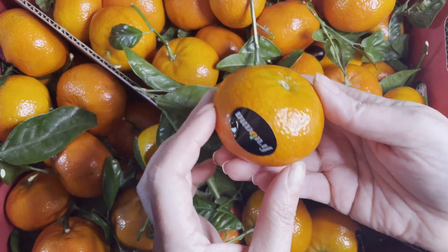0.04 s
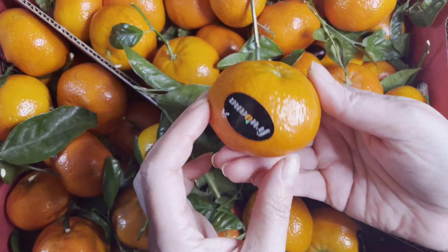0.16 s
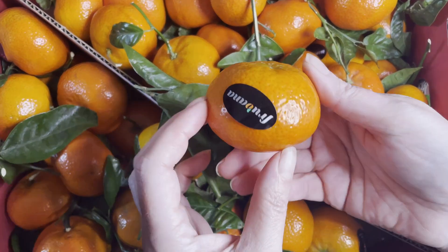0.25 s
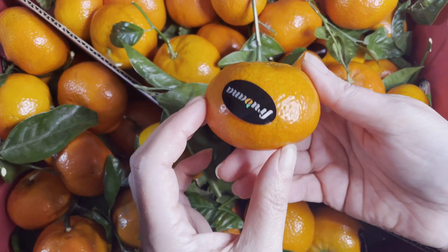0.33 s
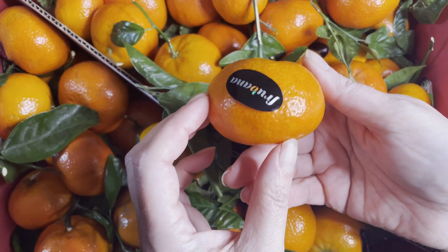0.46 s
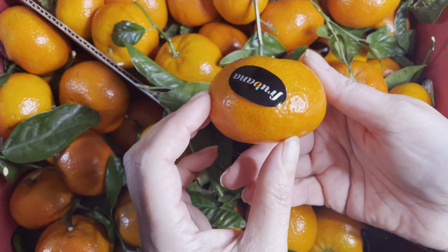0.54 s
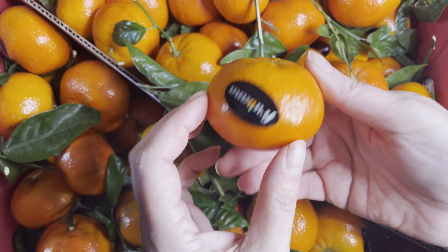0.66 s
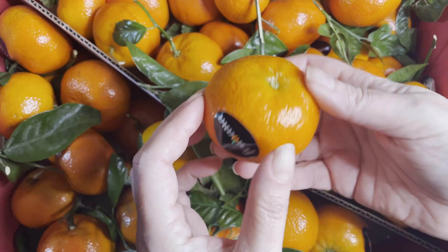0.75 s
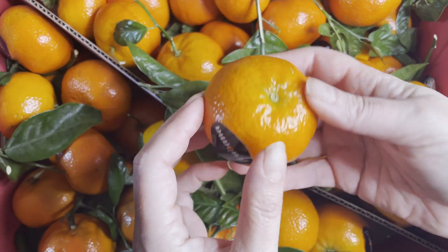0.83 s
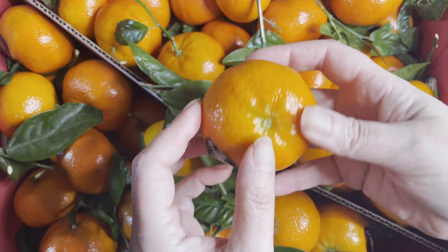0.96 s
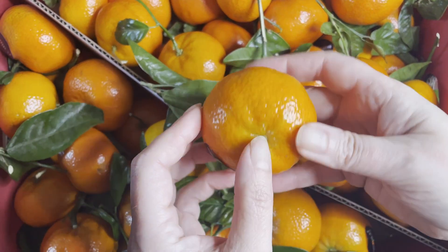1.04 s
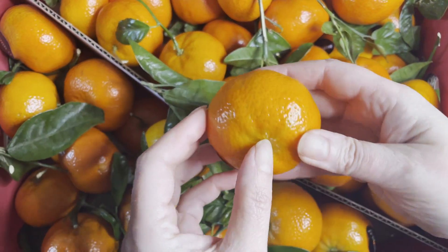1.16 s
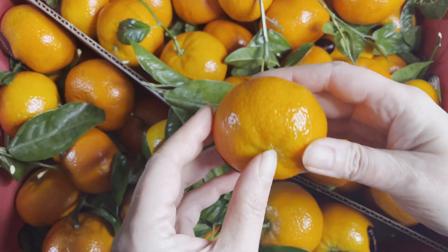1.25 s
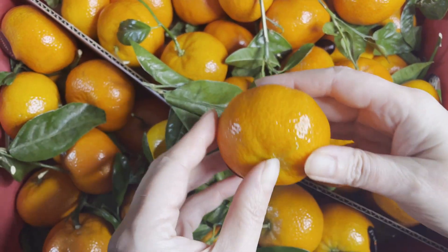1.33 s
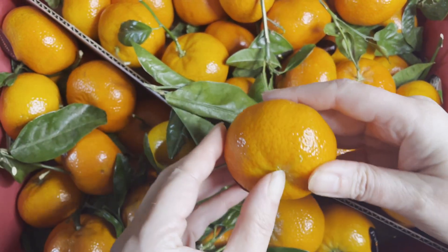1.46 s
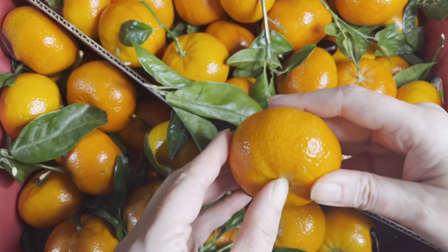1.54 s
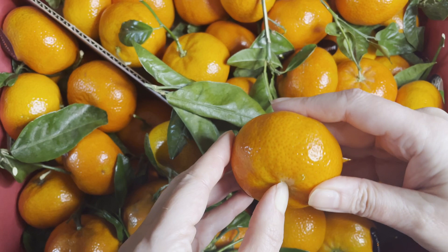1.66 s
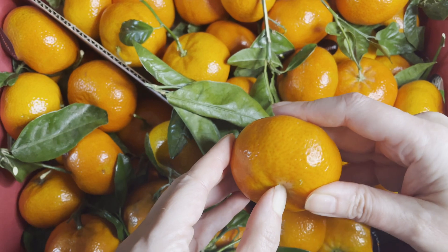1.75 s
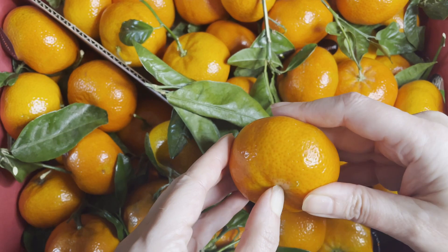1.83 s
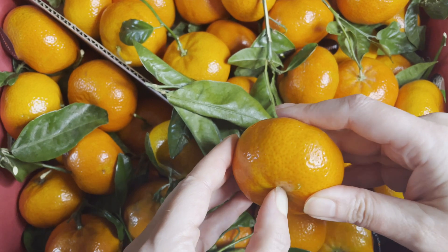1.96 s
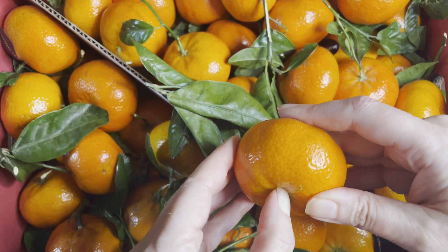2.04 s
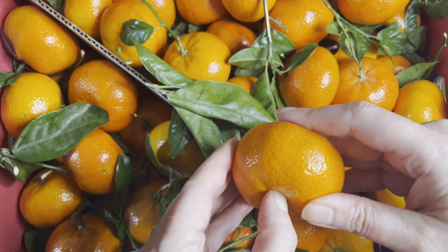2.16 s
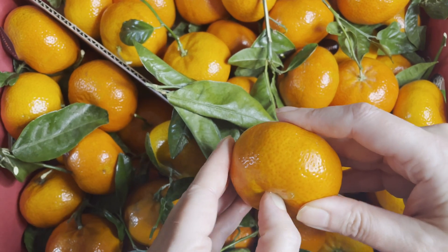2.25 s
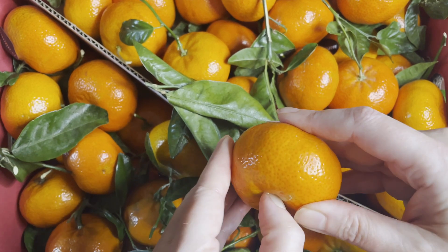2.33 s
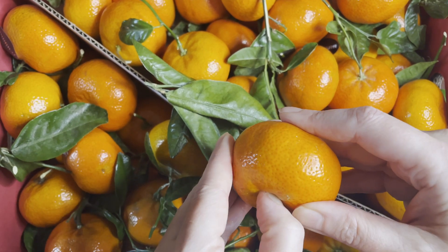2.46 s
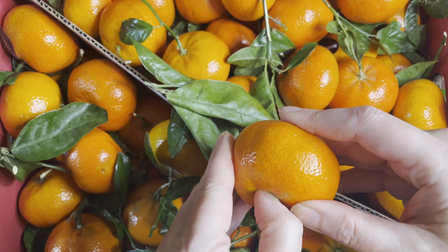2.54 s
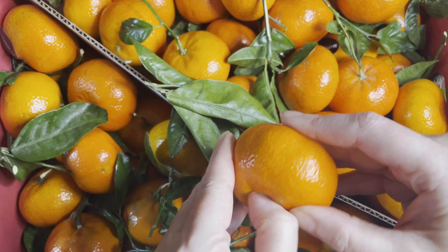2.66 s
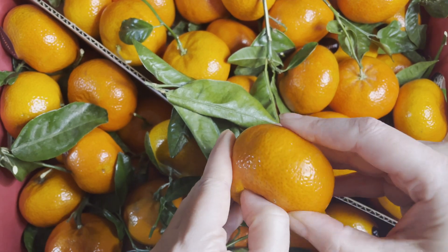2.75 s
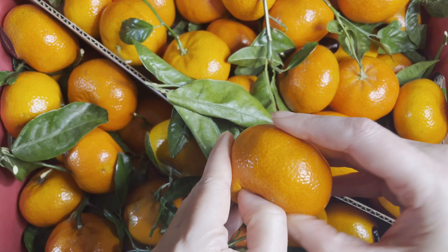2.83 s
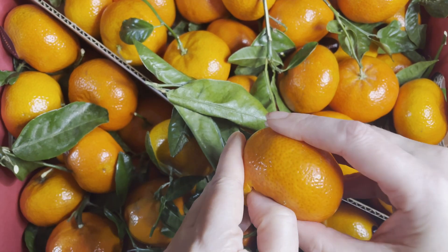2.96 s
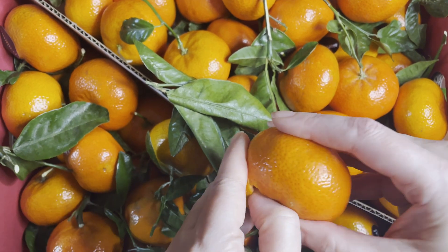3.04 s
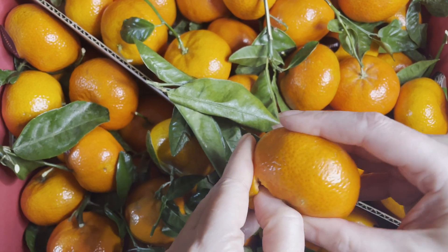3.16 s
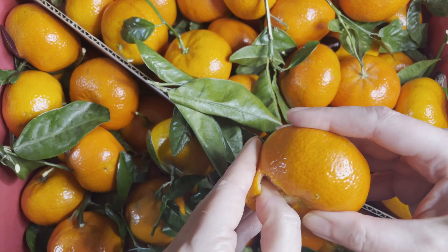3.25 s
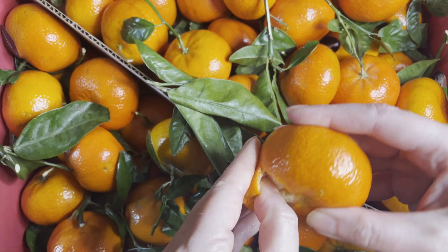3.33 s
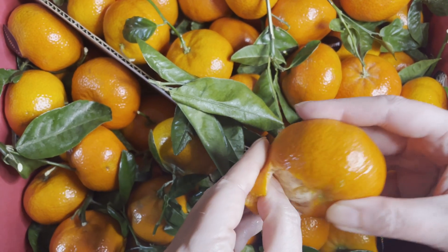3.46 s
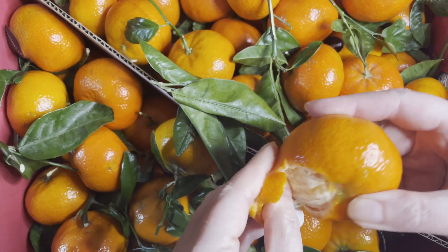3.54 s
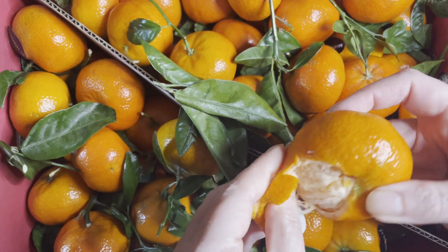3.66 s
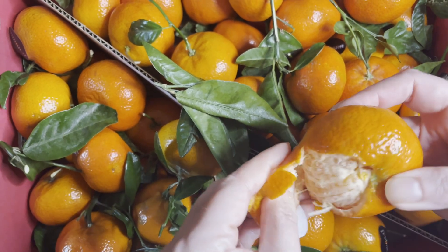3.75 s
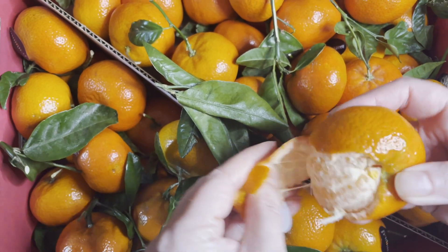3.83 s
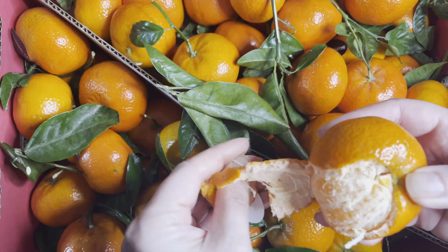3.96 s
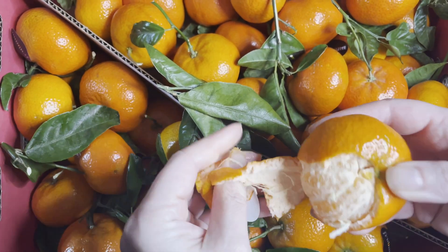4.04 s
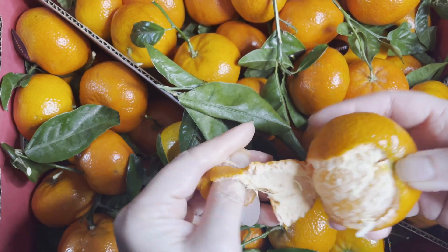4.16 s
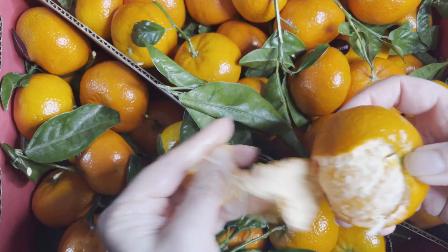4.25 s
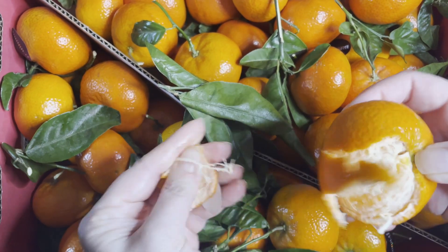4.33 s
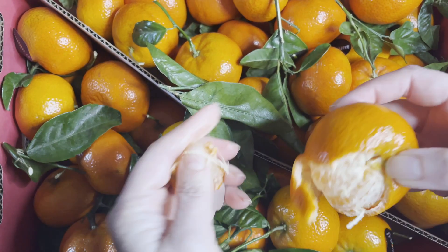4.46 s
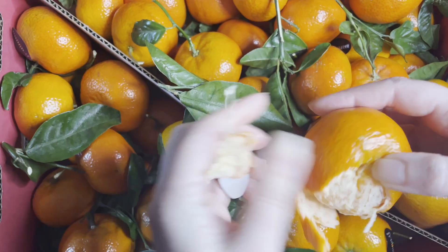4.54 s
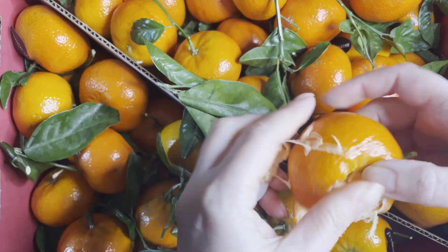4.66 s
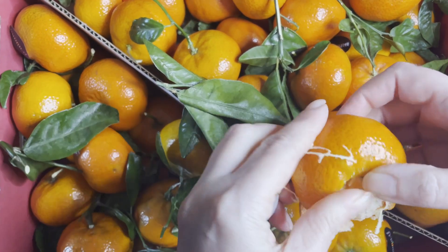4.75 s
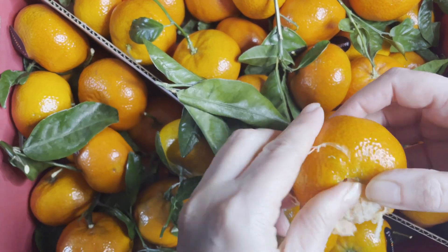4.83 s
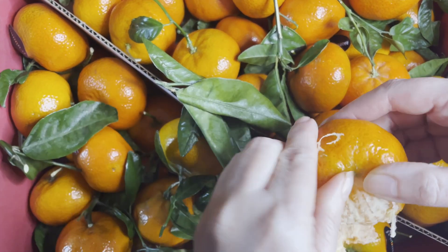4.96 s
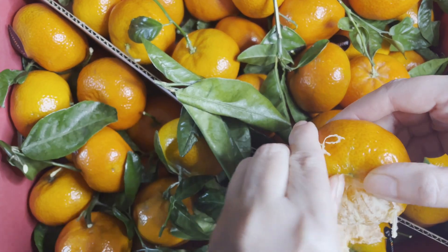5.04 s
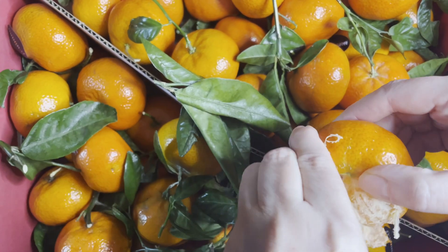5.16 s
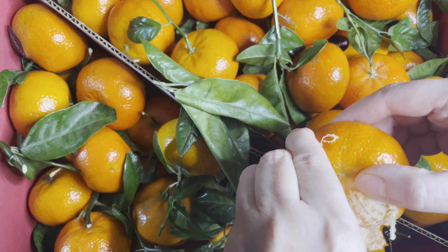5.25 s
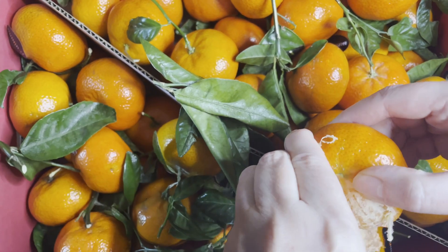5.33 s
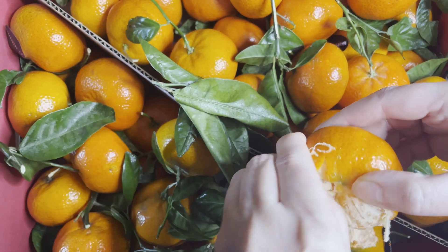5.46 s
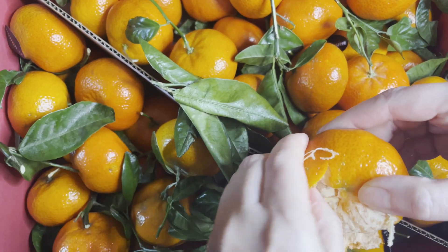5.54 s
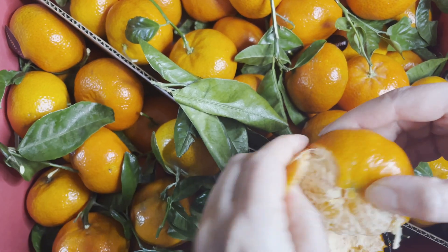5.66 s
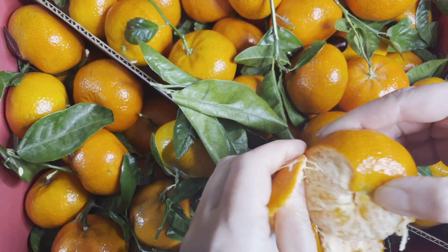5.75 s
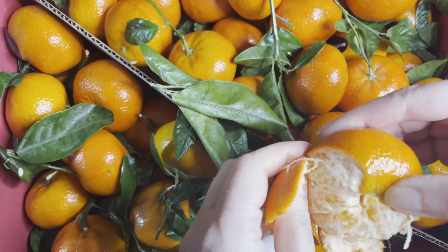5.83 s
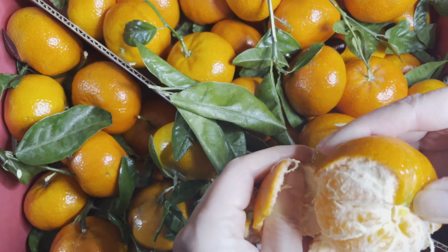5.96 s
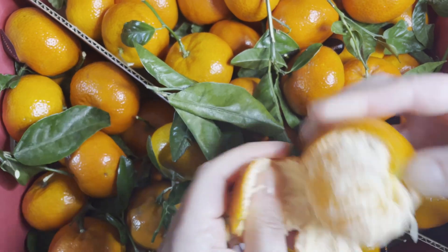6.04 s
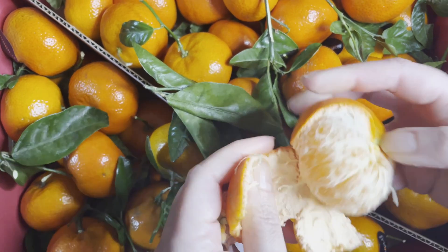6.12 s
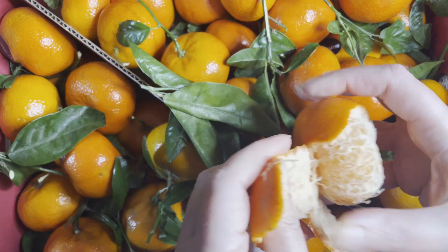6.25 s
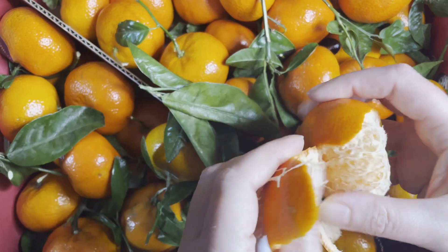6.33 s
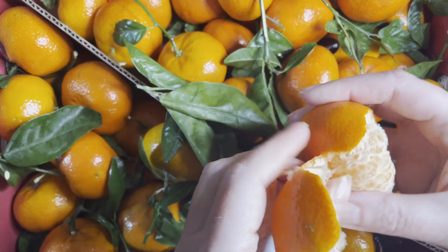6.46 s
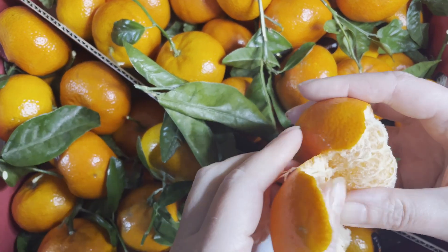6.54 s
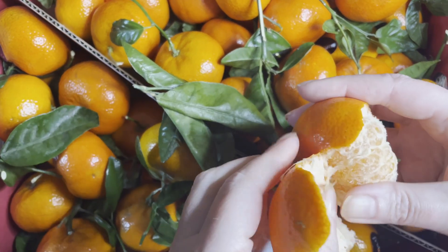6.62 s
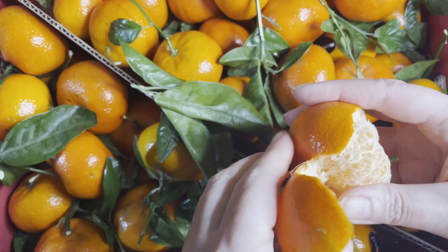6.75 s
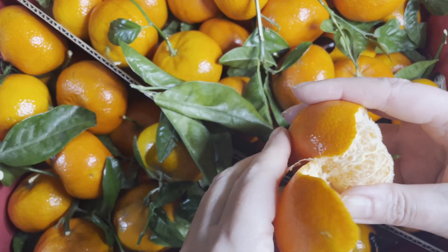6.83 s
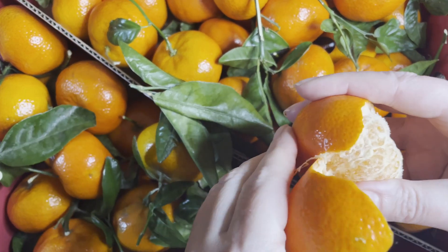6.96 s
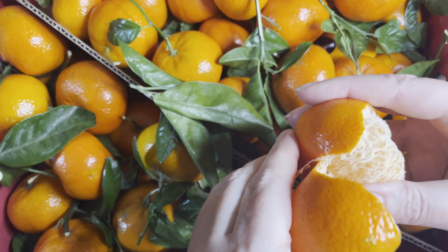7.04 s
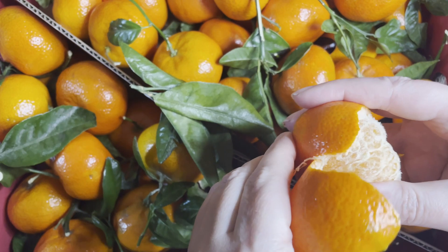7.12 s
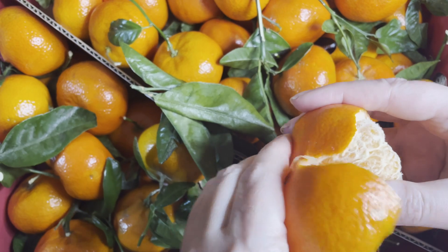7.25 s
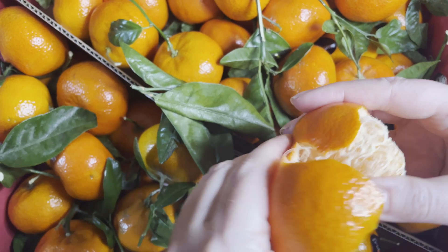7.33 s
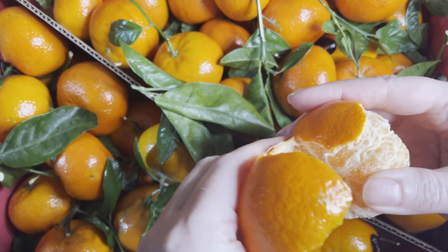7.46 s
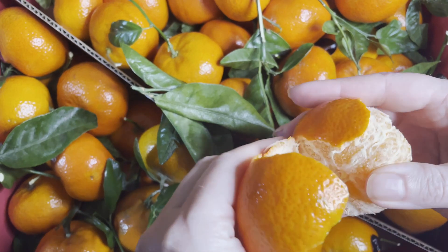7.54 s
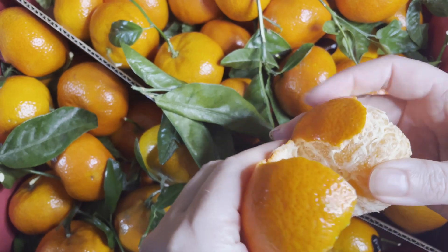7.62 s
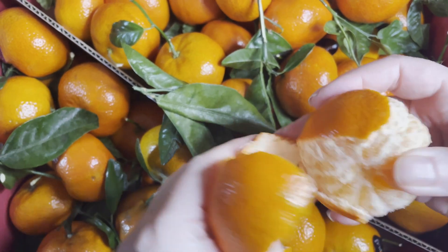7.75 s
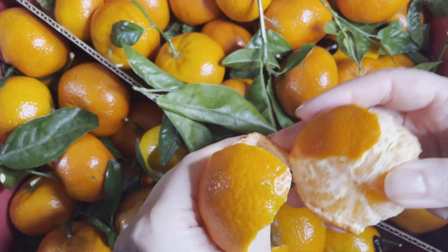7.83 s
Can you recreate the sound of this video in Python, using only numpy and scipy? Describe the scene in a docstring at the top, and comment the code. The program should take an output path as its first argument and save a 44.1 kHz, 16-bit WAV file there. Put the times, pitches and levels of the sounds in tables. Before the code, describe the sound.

Close, crisp tearing of citrus rind: bright snaps first, then bursts of wet-sounding crackle with short pauses, above a steady low machine hum.

```python
"""In a quiet, humming room, hands tear the peel off a mandarin close to a two-port microphone.
Pith fibres snap one by one as short coloured noise cracks; dense rips are hiss and random small cracks.
Fingertips rub the rind as friction noise, a pierced pore sprays a whistling jet of oil, and the fruit
knocks once against the palm as a few dying modes. Short reflections come off the hands and the room.
Behind them lie broad air noise, low room resonances and wavering hum lines."""
import sys
import numpy as np
from scipy import signal
from scipy.fft import rfft, irfft, next_fast_len
from scipy.io import wavfile
from scipy.ndimage import uniform_filter1d

SR = 44100
rng = np.random.default_rng(int(sys.argv[2]) if len(sys.argv) > 2 else 0)


def output_pcm(signal):
    """Save a mono or channel-first signal as 16-bit PCM at the path in sys.argv[1].

    Samples are clipped to [-1, 1] before scaling.
    """
    pcm = np.clip(np.atleast_2d(signal).T, -1, 1) * 32767
    wavfile.write(sys.argv[1], SR, np.round(pcm).astype(np.int16))


N = 347949  # samples, about 7.9 s


def gain_of(db):
    """Amplitude factor for a level in dB."""
    return 10 ** (np.asarray(db) / 20)


def evened(x):
    """Scales a sound to rms 1."""
    return x / np.sqrt(np.mean(x ** 2) + 1e-20)


def read(points, hz):
    """Reads a (Hz, value) curve, straight between points on a log frequency axis."""
    f, value = np.transpose(points)
    return np.interp(np.log(hz + 1), np.log(f + 1), value)


def add(mix, s, sound):
    """Adds a sound into the mix from s seconds on."""
    part = mix[round(s * SR):][:len(sound)]
    part += sound[:len(part)]


def resonate(x, hz, width):
    """A resonance of gain 1: shifts hz (fixed or gliding) down to zero, smooths, and shifts back."""
    turn = np.exp(2j * np.pi * np.cumsum(hz * np.ones(len(x))) / SR)
    r = np.exp(-np.pi * width / SR)
    smooth = signal.lfilter([1 - r], [1, -r], x / turn + 1e-18)
    return 2 * (turn * smooth).real


def causal(points):
    """Minimum-phase filter taps for a (Hz, dB) spectrum, floored at -60 dB."""
    db = np.maximum(read(points, abs(np.fft.fftfreq(4096, 1 / SR))), -60)
    log_gain = np.log(gain_of(db))
    return np.fft.ifft(np.exp(np.conj(signal.hilbert(log_gain)))).real[:2048]


def wander(fastest_hz):
    """Random curve of rms 1 from 24 sines, read every 256 samples: rates above 86 Hz fold down."""
    t = np.arange(0, N + 256, 256) / SR
    rates = np.geomspace(fastest_hz / 20, fastest_hz, 24)
    slow = np.sin(2 * np.pi * (rates[:, None] * t + rng.random((24, 1)))).sum(0)
    return np.interp(np.arange(N) / SR, t, evened(slow))


def burst(noise, rise_s, fall_s):
    """A crack: noise that swells in under a millisecond and dies in a few."""
    t = np.arange(noise.shape[-1]) / SR
    return noise * (1 - np.exp(-(t / rise_s) ** 2)) * np.exp(-t / fall_s)


# Colour of the tearing peel, for single snaps and rips alike. Each row: frequency in Hz, density in dB per Hz.
PEEL_COLOUR = [(240, -35.5), (400, -15), (810, -10.5), (1400, -3.5), (1750, -9.5), (2500, -2.5), (3300, -6),
               (5300, -5), (6200, -4), (7300, -8.5), (9700, -10.5), (11400, -12), (14600, -18),
               (15800, -16), (16500, -43)]
# Single fibre snaps that stand out, close to the microphone. Each row: time of the peak in seconds,
# peak level in dB, ring of the loose peel in Hz, then bass, body and treble over the middle in dB,
# to which snaps() adds one common tilt.
FIBRE_SNAPS = [(1.0787, -51.5, 1380, 23.5, 17, -4), (1.087, -58, 1030, 8, -2, -15),
               (1.7849, -23, 6040, -1, 9, 15.5), (2.0653, -27.5, 1470, 13, 17.5, -7.5),
               (2.071, -42, 1510, 8, 18, -4), (2.103, -43, 1460, 9, 12, -3.5),
               (2.1768, -45, 1550, 5, 13, -2.5), (2.3019, -16.5, 6100, -30, -26, 12.5),
               (2.3155, -23.5, 5700, -30, -20, 6.5), (2.3531, -10.5, 6100, -1.5, -4.5, 9.5),
               (2.6457, -48, 1377, 0, 0, -15), (2.7003, -48.5, 1420, -1, 0, -12),
               (2.7531, -15.5, 1500, -9, -2, 4), (2.786, -42, 6160, -15, -12, -1),
               (2.887, -38, 4180, -3, 6.5, -16), (2.917, -43, 6420, -5, -16, 10.5),
               (2.9993, -39, 4690, -2.5, 4, -14), (3.0367, -45, 1420, 6, 8, -4),
               (3.074, -39, 5800, -1, 5, 0.5), (3.1428, -39, 4050, -23, -10, -14),
               (3.1504, -33.5, 2630, -4, 1, -2.5), (3.1643, -32, 1550, -11, 10, -2.5),
               (3.1849, -33.5, 2710, -11, -5, 11), (3.2055, -33, 1510, -5, 7, -0.5),
               (3.2348, -36.5, 4800, -21, -4, -6), (3.2555, -34, 4150, -19, 3, -7.5),
               (3.3715, -39.5, 4200, -5, 6, -10), (3.3947, -31, 6030, -23, 4, 7),
               (3.4176, -20, 4350, -20, -4, -2.5), (3.42, -25.5, 2410, -17, 7, 5.5),
               (3.4556, -13.5, 3760, -17, 4.5, -2), (3.466, -31, 3060, -10, 0, -16),
               (3.5025, -37, 3100, -22.5, 0, 0.5), (3.5688, -29.5, 4360, -7, 2.5, -15.5),
               (3.5812, -33.5, 4000, -1, 7, -12), (3.6752, -36, 5250, 5, 7.5, -0.5),
               (3.692, -30.5, 5210, -3, -1, 7), (3.7124, -35, 2370, -8, 3, 2),
               (3.7239, -33.5, 3730, -4.5, 1, -7), (3.736, -30.5, 5400, -31, 6.5, -11),
               (3.7804, -34.5, 2930, -14, 4.5, -10), (3.811, -34, 3010, 0, -3, -25.5),
               (3.8198, -42, 5380, -9, -5.5, 8), (3.8382, -37, 2930, 2, -2, -11),
               (3.865, -32, 2240, 3.5, -4.5, -16), (3.885, -36.5, 6150, -7, 12, -3),
               (3.9113, -40, 4825, 10, 9, -8), (4.0442, -56, 5160, -12, -17, -6),
               (4.092, -57.5, 2269, -9.5, 1, -10), (4.2408, -44, 2500, -10.5, 5.5, 1),
               (4.441, -60.5, 6200, -8.5, -11, 8.5), (4.6451, -42.5, 1070, 1.3, -0.5, -16.5),
               (4.7623, -53.5, 5430, -3, -1, -6), (4.936, -36, 2132, 11, 14.5, -9.5),
               (4.9389, -50.5, 903, 16.5, 7.5, -7), (5.2822, -45, 1580, 1, 7, -14),
               (5.302, -36.5, 1510, -9, 2.5, -20), (5.3298, -38, 1340, -5, -1, -15),
               (5.3583, -34.5, 5600, -2, 3, -16), (5.3783, -36, 2560, 8, 10, -22),
               (5.4264, -37.5, 1550, -13, 6, -20), (5.5036, -51, 3880, -9, 7, -12),
               (5.5325, -45, 1590, -8.5, 14.5, -6), (5.5862, -46, 1550, -14, 8, -18),
               (5.6174, -31, 2940, -15, 9.5, -7), (5.6347, -32, 5210, -21, 2.5, -11),
               (5.6397, -25, 3530, -27, 2, -12), (5.652, -34, 1380, -7, 0, 9),
               (5.6577, -33, 2070, -3, 5.5, -15), (5.6655, -28, 3570, -21, 10, -9),
               (5.6753, -31, 2800, -2, 12.5, -5), (5.6896, -34, 2890, 3, 21.5, -10),
               (5.6938, -31.5, 2960, -12, 12.5, -23), (5.735, -41.5, 2200, -4.5, 2, -11.5),
               (5.797, -45, 2280, -19, 2, -9), (5.8225, -41.5, 1420, -14, 3, -18.5),
               (5.851, -41, 2150, -4.5, 9.5, -4), (5.873, -28.5, 2890, -18, -0.5, -17.5),
               (5.8881, -26.5, 2840, -9, 5.5, -15), (5.8985, -27, 2860, -14.5, 13.5, -20.5),
               (5.9197, -25, 3640, -9, 9, -24), (5.9284, -31, 2430, 12, 9.5, -20.5),
               (5.9433, -31.5, 2850, 10.5, 7.5, -20), (5.9717, -40.5, 2200, 3, 1.5, -5.5),
               (6.1374, -47.5, 4774, -18.5, -7, -1), (6.2511, -43.5, 3430, -12, 7, -10.5),
               (6.419, -59.5, 1510, 14.5, 14.5, -16.5), (6.5934, -41, 3620, -5, 7, -7.5),
               (6.7166, -55, 2370, -6, -1, -17.5), (6.82, -56.5, 1422, 5, 10, -13),
               (7.0691, -47, 1380, -1, 6, -5), (7.12, -44, 1420, 18, 14, -15),
               (7.2247, -21.5, 2600, -11, 10, -13.5), (7.2394, -37, 2550, -0.5, 3, -13),
               (7.2565, -26, 2570, 14, 21.5, -23.5), (7.2612, -26.5, 2400, -4, 6.5, -19.5),
               (7.2763, -27.5, 2630, 2, 3.5, -7.5), (7.2894, -32, 2280, -1, 12.5, -3),
               (7.3085, -35, 1460, 16.5, 13, -7), (7.321, -37.5, 2470, 16.5, 13, 2),
               (7.3397, -45, 2800, -1, 28, -14), (7.3926, -31, 2500, 10, 11, -13.5),
               (7.4046, -36.5, 1120, 10.5, 5.5, -12.5), (7.42, -36, 2760, 0.6, 23, -5),
               (7.447, -26.5, 2680, 7, 15, -30), (7.463, -40, 2450, 9, 3, -14.5),
               (7.4826, -36, 2890, -1, 9, -13), (7.4954, -35, 2110, -6, 7, -6),
               (7.509, -36.5, 2370, -15, 12, -8), (7.6481, -37.5, 2450, -12, 17, -10),
               (7.66, -46, 2500, 0, 15, 3), (7.683, -40, 2450, 12, 12, -19),
               (7.704, -27, 2440, -6, 7.5, -13), (7.7108, -33, 2330, 5, 5.5, -8),
               (7.734, -43, 2020, 9, -2, -13.5), (7.7541, -35, 2410, 11.5, -5, -16),
               (7.76, -30, 2330, 6, 8, -7), (7.7893, -34, 4760, 4, -6, -8),
               (7.804, -40.5, 2450, -16, 2, -13), (7.8485, -20.5, 2540, 15.5, 11.5, -11)]


def snaps():
    """Each breaking fibre has its own balance of bass, body and treble and rings the flap of peel briefly."""
    out, hz, colour = np.zeros(N), np.fft.rfftfreq(1024, 1 / SR), causal(PEEL_COLOUR)
    noises = rng.standard_normal((len(FIBRE_SNAPS), 1024))
    for (s, db, ring_hz, bass_db, body_db, treble_db), noise in zip(FIBRE_SNAPS, noises):
        tilt_db = read([(900, bass_db + 1.0), (1700, body_db - 3.0), (2900, body_db - 4.0),
                        (3600, 0.0051), (6500, 0.00075), (8000, treble_db + 9.5)], hz)
        ring = 1 + 1.7 / (1 + ((hz - ring_hz) / 400) ** 2)
        crack = rfft(np.roll(burst(noise, .0007, .0007), 44))
        crack /= np.sqrt(uniform_filter1d(abs(crack) ** 2, size=24))  # a break is broad in colour
        crack = irfft(crack * gain_of(tilt_db) * ring)
        # the coloured envelope sets the peak's time and level; scene() applies the colour
        envelope = abs(signal.hilbert(signal.oaconvolve(crack, colour)))
        envelope = np.sqrt(uniform_filter1d(envelope ** 2, size=30))
        add(out, s - envelope.argmax() / SR, gain_of(db) * crack / envelope.max())
    return out


# Rips, each a swell of crackle at the microphone. Each row: time of the peak in seconds, rise in seconds,
# fall in seconds, then body, middle and treble at the peak in dB.
RIP_SWELLS = [(1.789, .025, 0.1, -72.5, -88, -65), (1.9, .15, .1, -83.5, -101, -74),
              (2.072, .012, 0.086, -54, -75, -67), (2.098, .03, .04, -65.5, -84, -59),
              (2.2, .06, .3, -79, -92, -59.5), (2.309, 0.047, .05, -71, -56, -45.5),
              (2.362, .04, 0.085, -63.5, -61.5, -48.5), (2.656, .05, 0.12, -61, -67.5, -65.5),
              (2.76, 0.018, .2, -64, -62.5, -60), (3.038, 0.099, .3, -70.5, -72, -67.5),
              (3.156, 0.043, .08, -57.5, -70, -69), (3.209, 0.064, .12, -55, -52.5, -54.5),
              (3.455, .07, 0.11, -52.5, -46.5, -47.5), (3.563, .07, .1, -57.5, -55, -57),
              (3.72, .08, .2, -58.5, -56, -56), (3.809, 0.079, 0.063, -45, -48.5, -48.5),
              (3.898, 0.25, 0.046, -57, -61, -58), (4.237, 0.13, 0.037, -70.5, -69, -65),
              (4.438, 0.047, 0.18, -93, -78, -75), (4.593, .07, .05, -80, -75.5, -73),
              (4.651, 0.026, 0.055, -67.5, -76, -86), (4.883, .1, 0.088, -73, -90, -94),
              (4.943, 0.048, .14, -70, -85, -79), (5.129, 0.13, 0.087, -78.5, -82, -84),
              (5.366, 0.071, 0.063, -51, -53.5, -58.5), (5.426, 0.037, 0.031, -58.5, -67, -74),
              (5.642, .05, 0.09, -42.5, -43.5, -48), (5.809, 0.076, 0.09, -64.5, -67, -66),
              (5.905, .07, 0.076, -43, -47.5, -51), (6.045, .1, .05, -78, -76, -70),
              (6.258, .025, 0.094, -69.5, -70.5, -85), (6.589, 0.016, 0.072, -69, -71, -76),
              (7.118, .05, 0.33, -68, -79, -72.5), (7.228, .012, 0.1, -45, -52, -53.5),
              (7.297, 0.12, .12, -51.5, -65, -64), (7.49, .25, 0.05, -58, -68, -71),
              (7.643, 0.023, .1, -51.5, -55.5, -56.5), (7.74, 0.045, 0.056, -43.5, -47, -50),
              (7.855, 0.023, 0.34, -64, -75, -85)]
# Soft rustle of fingers on the fruit between the rips. Each row: time in seconds, level of the body in dB.
FINGER_RUSTLE = [(0, -79), (.07, -94.5), (1.68, -95), (1.74, -84), (1.92, -90.5), (2.0, -91), (2.55, -89),
                 (2.7, -78.5), (3.65, -71.5), (3.96, -76.5), (4.2, -79.5), (4.3, -86.5), (4.41, -89.5),
                 (4.68, -78), (5.03, -85), (5.24, -91), (5.5, -71.5), (6.05, -80), (6.14, -83), (6.45, -92),
                 (6.77, -75.5), (7.06, -82), (7.45, -65), (7.6, -80.5), (7.89, -73)]
RUSTLE_MIDDLE_DB, RUSTLE_TREBLE_DB = -1, -1  # over the body
RIP_EDGE_DB = 20  # a rip is this much softer one rise before and one fall after its peak
RIP_ROUND = 1.015  # over 1, the top of the swell is rounded and its flanks steep


def pull_db():
    """Body, middle and treble level over time: the rustle with every rip swelling out of it in power."""
    t = np.arange(0, N + 64, 64) / SR
    over_body_db = np.array([[0], [RUSTLE_MIDDLE_DB], [RUSTLE_TREBLE_DB]])
    power = gain_of(2 * (np.interp(t, *np.transpose(FINGER_RUSTLE)) + over_body_db))
    for s, rise_s, fall_s, *peak_db in RIP_SWELLS:
        away = np.maximum((s - t) / rise_s, (t - s) / fall_s)
        power = power + gain_of(2 * (np.array(peak_db)[:, None] - RIP_EDGE_DB * away ** RIP_ROUND))
    return [np.interp(np.arange(N) / SR, t, 10 * np.log10(band)) for band in power]


FLAP_HZ, FLAP_WIDTH_HZ = 2720, 800  # the hollow between loose peel and fruit
FLAP_FROM_S, FLAP_FULL_S, FLAP_RING = 3.7, 7.0, 1  # it rings more as the peel comes away


def tearing():
    """A hiss plus random small cracks that crowd in as the pull grows, levelled in three bands."""
    bands_db = pull_db()
    pull = np.clip((np.maximum(bands_db[0], bands_db[1]) + 84) / 35, 0, 1)
    per_s = 200 + 1000 * pull  # cracks per second
    happens = rng.random(N) < per_s / SR
    size = gain_of(3.98 * np.minimum(rng.exponential(1, N), 4)) * happens

    kind = rng.integers(0, 16, N)
    shapes = burst(rng.standard_normal((16, 200)), .0003, .0006)
    rings_hz = np.geomspace(1200, 11000, 16)  # thick fibres ring low, thin ones high
    shapes = [shape + resonate(shape, hz, hz / 4) for shape, hz in zip(shapes, rings_hz)]
    cracks = sum(signal.oaconvolve(size * (kind == k), shape)[:N] for k, shape in enumerate(shapes))
    cracks = evened(cracks / np.sqrt(per_s))

    grainy = np.clip(.3 + .7 * pull, 0, .95)  # light rubbing is smooth, hard pulls crackle
    hiss = rng.standard_normal(N) * gain_of(3.97 * wander(40))
    drive = grainy * cracks + np.sqrt(1 - grainy ** 2) * hiss
    drive = signal.oaconvolve(drive, causal(PEEL_COLOUR))[:N]

    below_3300, below_7200 = [signal.sosfiltfilt(signal.butter(3, hz, fs=SR, output="sos"), drive)
                              for hz in (3300, 7200)]
    loose = np.clip((np.arange(N) / SR - FLAP_FROM_S) / (FLAP_FULL_S - FLAP_FROM_S), 0, 1)
    body = below_3300 + FLAP_RING * loose * resonate(below_3300, FLAP_HZ, FLAP_WIDTH_HZ)
    bands = body, below_7200 - below_3300, drive - below_7200
    return sum(gain_of(db) * evened(band) for db, band in zip(bands_db, bands))


# Fingertips slide briefly on the rind, close by. Each row: start in seconds, length in seconds,
# level in dB before flutter and fading, centre in Hz, width in Hz.
RIND_RUBS = [(0.151, 0.094, -85, 11000, 4000), (0.435, 0.058, -77, 1660, 1820),
             (0.6, 0.077, -82, 8900, 2000), (0.949, 0.013, -80, 2230, 794), (1.066, 0.05, -74, 1500, 1300),
             (1.92, 0.052, -71, 1560, 746), (6.686, 0.15, -73, 2565, 600.4), (6.725, .33, -80.5, 5500, 896)]


def rubs():
    """Friction: short patches of resonant noise that flutter and weaken."""
    out, flutter = np.zeros(N), gain_of(4.2 * wander(200))
    for s, length_s, db, hz, width in RIND_RUBS:
        noise = rng.standard_normal(SR // 2)[:int(length_s * SR)]
        scrape = evened(resonate(resonate(noise, hz, width), hz, width))
        scrape = scrape * flutter[round(s * SR):][:len(noise)]
        fade = signal.windows.tukey(len(noise), .6) * np.linspace(1.3, .6, len(noise))
        add(out, s, gain_of(db) * scrape * fade)
    return out


# Oil squeezed out under the thumbnail, close by. Each row: time in seconds, level in dB before the sputter,
# whistle in Hz.
OIL_SPRAY = [(2.18, -64, 11700), (2.192, -50.5, 10000), (2.202, -51, 9100), (2.218, -51.5, 8900),
             (2.235, -55.5, 7860), (2.248, -56, 8800), (2.263, -51, 9600), (2.275, -58.5, 10500),
             (2.297, -50.5, 10800)]


def spray():
    """A jet through a small pore: sputtering noise with a gliding whistle."""
    s, level_db, hz = np.transpose(OIL_SPRAY)
    t = np.arange(s[0], s[-1], 1 / SR)
    noise, pitch = rng.standard_normal(len(t)), np.interp(t, s, hz)
    whistle = evened(resonate(resonate(noise, pitch, 900), pitch, 900))
    jet = whistle + 0.28 * evened(resonate(noise, pitch, 2500))
    sputter_db = 5.0 * wander(151)[:len(t)]
    jet *= gain_of(np.interp(t, s, level_db) + sputter_db) * signal.windows.tukey(len(t), .1)
    out = np.zeros(N)
    add(out, s[0], jet)
    return out


# The fruit knocks against the palm, once. The row: start in seconds, peak level in dB.
PALM_KNOCK = (7.63, -36.5)
# Modes of the fruit. Each row: frequency in Hz, relative level in dB, decay time in seconds.
FRUIT_MODES = [(143, 0, .022), (291, 9, 0.0082), (495, -5, 0.014), (800, 2, 0.0034)]


def thump():
    """A soft, loose knock: flesh lands unevenly and the low modes die in a few cycles."""
    out, t = np.zeros(N), np.arange(6000) / SR
    ring = sum(gain_of(db) * np.sin(2 * np.pi * hz * t) * np.exp(-t / decay_s) * (1 - np.exp(-t * hz / 1.5))
               for hz, db, decay_s in FRUIT_MODES)
    landing = burst(1 + rng.standard_normal(1500), .0004, .0006)
    knock = signal.oaconvolve(ring, landing)
    start_s, peak_db = PALM_KNOCK
    add(out, start_s, gain_of(peak_db) * knock / abs(knock).max())
    return out


def reflections(x, t60, first):
    """Sparse taps of random sign, different at each port, from sample first on, falling 60 dB in t60 s."""
    at = np.arange(first, first + 7920, 20) + rng.integers(0, 20, (2, 396))
    taps = np.zeros((2, 8100))
    np.put_along_axis(taps, at, rng.choice([-1., 1.], at.shape) * gain_of(-60 * at / SR / t60), 1)
    taps /= np.linalg.norm(taps, axis=1)[:, None]
    return signal.oaconvolve(x[None], taps, axes=1)[:, :N]


# What fingers and fruit scatter differently to each port. Each row: frequency in Hz, level in dB.
HAND_SCATTER = [(500, -4.5), (4300, -9), (5500, -1), (6500, 3.5), (7300, -15), (9000, -13.5),
                (11000, -22.5), (13000, -10.5)]


def hand_scatter(near):
    """Very short reflections off fingers and fruit, with their own colour."""
    return reflections(signal.oaconvolve(near, causal(HAND_SCATTER))[:N], .008, 4)


def room_echo(near):
    """Soft later reflections: cardboard and leaves swallow treble."""
    dulled = signal.sosfilt(signal.butter(1, 5000, fs=SR, output="sos"), near)
    return gain_of(-19) * reflections(dulled, .09, 80)


# The strongest hum line in the room. Each row: time in seconds, slow level in dB rms before a quicker waver.
MAIN_HUM_LEVEL = [(0.0, -49), (0.09, -51.5), (0.17, -59), (0.26, -51.5), (0.37, -67), (0.46, -53),
                  (1.03, -53.5), (1.67, -51.5), (1.71, -56.5), (2.31, -51.5), (2.9, -52), (2.94, -58),
                  (3.18, -50), (3.29, -62), (3.47, -49.5), (3.56, -56), (3.73, -50.5), (4.57, -56.5),
                  (5.51, -50.5), (6.53, -56), (6.77, -49), (6.85, -59), (7.16, -51.5), (7.25, -56.5),
                  (7.71, -51), (7.89, -52.5)]
MAIN_HUM_HZ = 250.4
# Weaker lines of the machine hum. Each row: frequency in Hz, middle level in dB rms, waver in dB.
HUM_LINES = [(59.48, -60.5, 2.5), (118.4, -65, 0.5)]


def hum():
    """Machine hum: sine lines that waver in level and phase."""
    t = np.arange(N) / SR
    weaker = sum(np.sqrt(2) * gain_of(db + waver_db * wander(7.1)) * np.sin(2 * np.pi * f * t + .5 * wander(4.4))
                 for f, db, waver_db in HUM_LINES)
    main_db = np.interp(t, *np.transpose(MAIN_HUM_LEVEL)) + 1.7 * wander(13)
    main = np.sqrt(2) * gain_of(main_db) * np.sin(2 * np.pi * MAIN_HUM_HZ * t + 1.1 * wander(2.5))
    return weaker + main


# Room resonances in the noise. Each row: frequency in Hz, width in Hz, level in dB rms.
ROOM_RESONANCES = [(173, 26, -64), (185.5, 12, -68.5)]


def rumble():
    """Low room resonances picked out of one noise."""
    noise = rng.standard_normal(N)
    return sum(gain_of(db) * evened(resonate(resonate(noise, f, width), f, width))
               for f, width, db in ROOM_RESONANCES)


# Broad noise of the room. Each row: frequency in Hz, relative level in dB.
AIR_COLOUR = [(20, -44.5), (35, -26.5), (55, -8.5), (100, -9), (195, -17.5), (250, -9.5), (300, -20),
              (363, -23.5), (530, -33), (1190, -40.5), (1650, -51), (4870, -50.5), (7300, -55),
              (9570, -56.5), (16000, -69)]
# How alike that noise is at the two ports. Each row: frequency in Hz, likeness from 0 to 1.
PORT_LIKENESS = [(60, 0.93), (150, 0.69), (380, 0.18), (1200, 0.046), (2400, 0.38), (3500, .4), (5700, .15),
                 (7500, 1), (13000, 0.5)]
AIR_DB = -60.5  # rms over both ports


def air():
    """Broad noise built from random spectra, partly shared by the ports at each frequency."""
    frames, hz = N // 512 + 5, np.fft.rfftfreq(2048, 1 / SR)
    a, b, c, d = rng.standard_normal((frames, 1025, 4)).T
    same = np.clip(read(PORT_LIKENESS, hz), -1, 1)[:, None]
    left = a + 1j * b
    right = same * left + np.sqrt(1 - same ** 2) * (c + 1j * d)
    spectra = np.array([left, right]) * gain_of(read(AIR_COLOUR, hz))[:, None]
    return gain_of(AIR_DB) * evened(signal.istft(spectra, nperseg=2048, noverlap=1536)[1][:, :N])


def scene():
    """The peeling with its reflections, the knock on the palm and the room behind, at two ports."""
    near = signal.oaconvolve(snaps(), causal(PEEL_COLOUR))[:N] + tearing() + rubs() + spray()
    background = hum() + rumble() + air()
    return near + hand_scatter(near) + room_echo(near) + thump() + background


# Sensitivity of the two microphone ports. Each row: frequency in Hz, left over right in dB.
LEFT_OVER_RIGHT = [(60, 1.8), (200, 3.5), (600, 3.5), (1700, .3), (2900, 2), (4500, 0), (5900, 2.5),
                   (7500, 0), (15000, 0)]
# Sound reaches the ports by different paths. Each row: frequency in Hz, lead of right over left in radians.
RIGHT_LEAD = [(600, 0.4), (1700, 0), (2750, -0.9), (4500, -0.86), (5500, -1.25), (6300, -4), (7300, -2.5),
              (7900, -2.5), (9000, -1.77), (10000, -1), (11000, 0), (12050, 1.1), (13100, 1.9),
              (14400, 3.1), (16200, 3.5)]
EDGE_HZ = 16850  # upper band limit


def record(dry):
    """Two ports with their own sensitivity and path length; then the band limit."""
    size = next_fast_len(N)
    hz = np.fft.rfftfreq(size, 1 / SR)
    half = np.array([[.5], [-.5]])  # each port takes half the difference
    ports = gain_of(read(LEFT_OVER_RIGHT, hz) * half) * np.exp(-1j * read(RIGHT_LEAD, hz) * half)
    heard = irfft(rfft(dry, size) * ports, size)[:, :N]
    band_limit = signal.firwin(511, EDGE_HZ, window=("kaiser", 9), fs=SR)
    return signal.oaconvolve(heard, band_limit[None], "same")


dry = scene()
out = record(dry)
output_pcm(out)
```